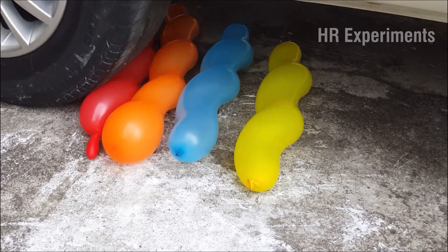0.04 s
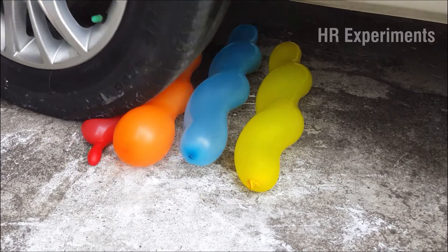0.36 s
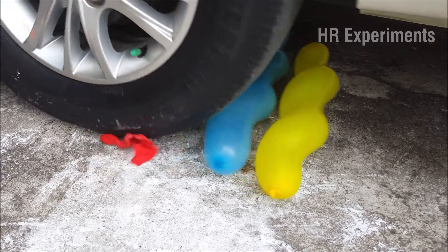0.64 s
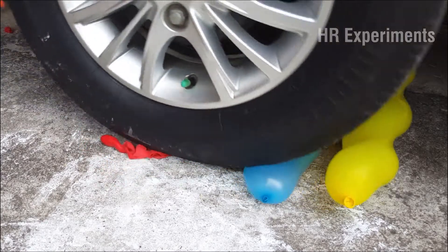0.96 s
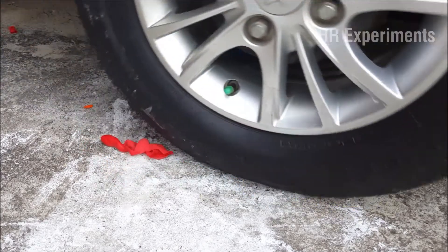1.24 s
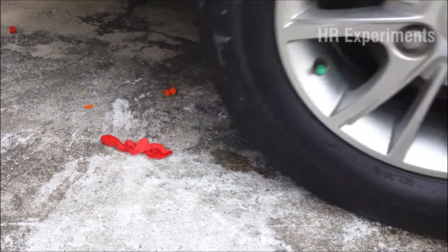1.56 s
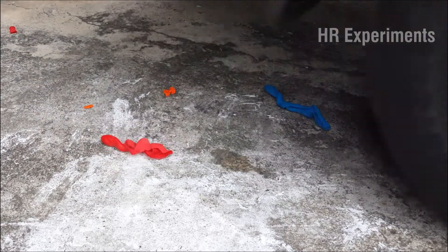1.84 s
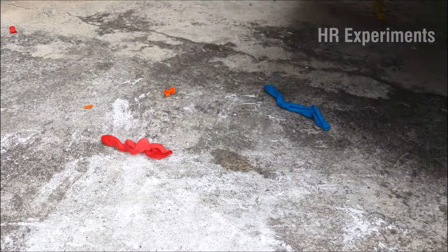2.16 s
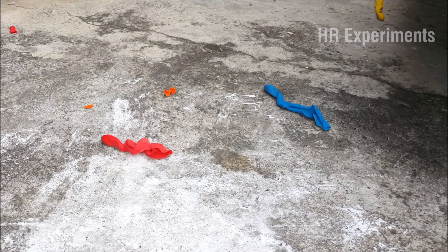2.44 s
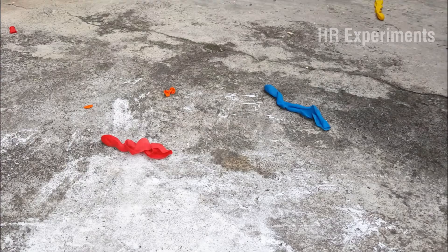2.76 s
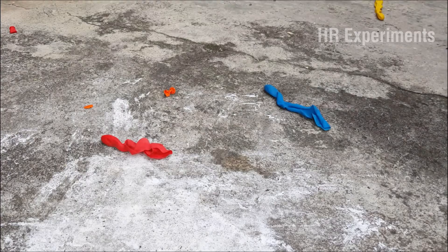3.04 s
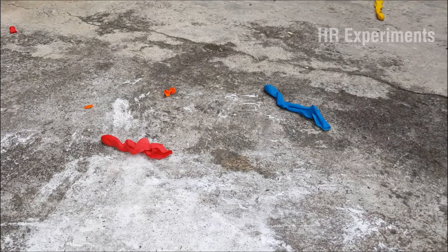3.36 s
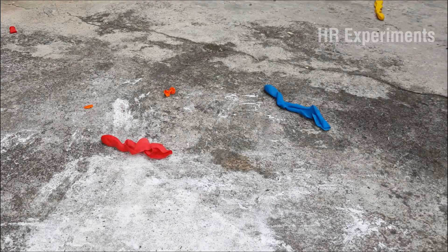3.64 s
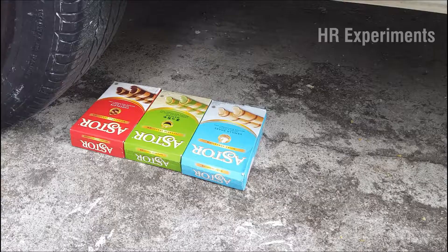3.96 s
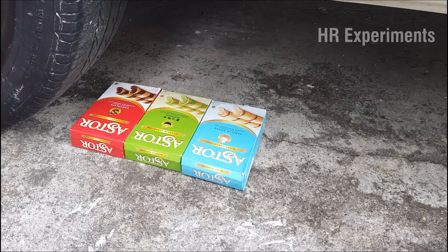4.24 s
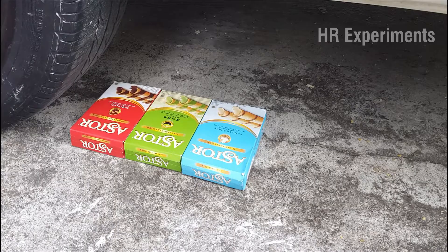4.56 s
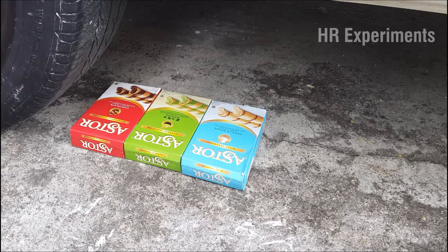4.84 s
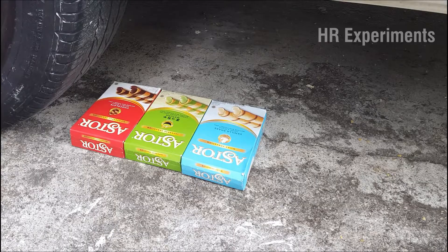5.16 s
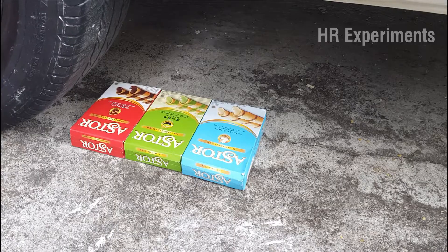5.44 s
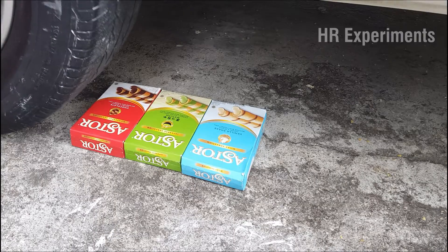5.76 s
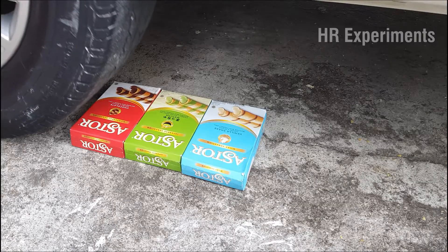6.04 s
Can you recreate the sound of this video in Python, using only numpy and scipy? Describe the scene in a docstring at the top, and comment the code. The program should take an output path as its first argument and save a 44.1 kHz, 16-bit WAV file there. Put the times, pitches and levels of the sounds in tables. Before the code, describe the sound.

Outdoors on concrete, close to the microphone, a car rolls onto balloons, which go off almost at once with two small snaps and three sharp, ringing bangs. Afterwards only the low engine hum remains, with a brief tyre hiss and three barely audible hoots far away. The idle then turns suddenly a little fuller, a few dull knocks sound, and the throttle just begins to open.

```python
"""An engine runs close to a stereo microphone in a concrete yard as a car rolls up, grit ticking in its tread.
The tyre bursts a row of long balloons: two small snaps, then three bangs that ring under the car and
die away round the yard. The recorder's gain ducks, holds and creeps back while the car rolls on,
with a brief tread hiss and three faint hoots far off. After an abrupt change of scene the engine
idles close by with a few soft clunks, and grows louder at the very end as the throttle opens."""
import sys
import numpy as np
from scipy import signal
from scipy.fft import rfft, irfft, next_fast_len
from scipy.io import wavfile
from scipy.ndimage import uniform_filter1d, minimum_filter1d

SR = 44100
rng = np.random.default_rng(int(sys.argv[2]) if len(sys.argv) > 2 else 0)


def file_out(sig):
    """Save sig as 16-bit WAV at sys.argv[1]."""
    # one column per channel
    cols = np.atleast_2d(sig).T
    # limit, then scale
    lim = np.clip(cols, -1, 1)
    pcm = np.round(lim * 32767).astype(np.int16)
    wavfile.write(sys.argv[1], SR, pcm)


N = 273420
TIME = np.arange(N) / SR
FFT_SIZE = 2 * next_fast_len(N // 2 + SR // 4)
FREQS = np.maximum(np.arange(FFT_SIZE // 2 + 1) * SR / FFT_SIZE, 1)
THROTTLE_S = 5.92

# How alike left and right are. Each row: frequency in Hz, correlation for the bursts, for the car.
STEREO_LIKENESS = [(60, .1, .99), (130, 0.8, 0.97), (220, 0.62, 0.89), (393, 0.87, 0.91), (710, 0.2, 0.14),
                   (1190, -.25, 0.47), (2470, .05, 0.34), (5010, -.1, 0.026)]


def from_db(db):
    """Decibels to gain."""
    return 10 ** (np.asarray(db) / 20)


def since(start):
    """Seconds gone by since start, zero before it."""
    return np.maximum(TIME - start, 0)


def decay(start, t60, rise):
    """Envelope that swells after start and dies away."""
    age = since(start)
    return (1 - np.exp(-age / rise)) * from_db(-60 * np.minimum(age / t60, 4))


def white():
    """Two unrelated white noises."""
    return rng.standard_normal((2, N))


def drift(per_s):
    """A random wobble with a new value so many times a second."""
    return np.interp(TIME * per_s, np.arange(N), np.clip(rng.standard_normal(N), -2, 2))


def tone(hz, width_hz):
    """A sine of rms 1 whose phase wanders enough to blur it to the given width."""
    kicks = rng.standard_normal(N) * np.sqrt(2 * np.pi * width_hz / SR)
    pole = np.exp(-4 * np.pi * width_hz / SR)
    wander = signal.lfilter([1 - pole], [1, -pole], kicks)
    return np.sqrt(2) * np.sin(np.cumsum(2 * np.pi * hz / SR + wander))


def butterworth(x, order, edges_hz, kind):
    """Low-, high- or band-pass with a flat passband."""
    return signal.sosfilt(signal.butter(order, edges_hz, kind, fs=SR, output="sos"), x)


def resonance(x, hz, width_hz):
    """Two-pole band-pass with gain 1 at its peak."""
    r = np.exp(-np.pi * width_hz / SR)
    feedback = [1, -2 * r * np.cos(2 * np.pi * hz / SR), r * r]
    return signal.lfilter(np.array([1, 0, -1]) * (1 - r * r) / 2, feedback, x)


def curves(rows):
    """The columns of a (Hz, ..) table at every frequency, joined on a log axis."""
    hz, *columns = np.transpose(rows)
    return [np.interp(np.log(FREQS), np.log(hz), column) for column in columns]


def colour(x, curve_db, lag_s=0):
    """Minimum-phase filter with the given gain curve and delay: nothing sounds early."""
    cepstrum = irfft(np.log(from_db(curve_db)))
    cepstrum[1:FFT_SIZE // 2] *= 2
    cepstrum[FFT_SIZE // 2 + 1:] = 0
    response = np.exp(rfft(cepstrum) - 2j * np.pi * FREQS * lag_s)
    return irfft(rfft(x, FFT_SIZE) * response)[..., :N]


def spread(pair, density_db, likeness):
    """Two white signals become left and right, with a spectrum in dB per Hz and a correlation."""
    alike = np.clip(likeness, -.99, .99)
    mid = colour(pair[0], density_db + 10 * np.log10((1 + alike) / 2))
    side = colour(pair[1], density_db + 10 * np.log10((1 - alike) / 2))
    return np.sqrt(SR / 2) * np.array([mid + side, mid - side])


def car_places(pass_s=1.32, pass_length_s=0.64, cut_s=3.81):
    """Shares over time of the car's three places: rolling up, rolled past, idling close."""
    close = np.clip(since(cut_s) / 0.0051, 0, 1)
    past = np.clip((TIME - pass_s) / pass_length_s + .5, 0, 1)
    return np.array([(1 - past) * (1 - close), past * (1 - close), close])


def underbody(x, echo=0.11, longest_s=.03, low_hz=600, count=8):
    """Short echoes between floor pan and ground put a steady ripple on the treble."""
    treble = butterworth(x, 2, low_hz, "high")
    lags = (rng.uniform(.002, longest_s, count) * SR).astype(int)
    return x + echo * sum(np.pad(treble, [(0, 0), (lag, 0)])[:, :N] for lag in lags)


def engine(firing_hz=26.08, first_firing_s=0.024, throb=0.1, valve_throb=0.06, uneven=0.82,
           hiss_db=0.04, chatter_depth=.4, throttle_db_per_s=8):
    """Rumble and hiss pulse with the firings over steady tones, all shaded by where the car stands."""
    # Engine noise. Each row: frequency in Hz, then dB per Hz rolling up, rolled past, idling close.
    noise_spectra = [(20, -68.5, -75, -73), (45, -75.5, -68.5, -69.5), (77.5, -57, -66, -64),
                     (124, -66.5, -68.5, -64), (174, -65, -72, -70.5), (254, -66, -74, -68),
                     (314, -73.5, -77, -75), (631, -75, -81, -78), (1140, -76.5, -85.5, -80.5),
                     (2430, -77, -87, -79.5), (4063, -80.5, -92, -84), (5340, -88.5, -100, -91),
                     (9120, -98.5, -109, -101), (15500, -104, -115, -105)]
    # Hum, belt ring and other tones. Each row: pitch and width in Hz, then dB at the same three places.
    steady_tones = [(26.1, 0.14, -53, -54, -50), (76, 4, -62, -56.5, -51.5), (84.7, 2.5, -62.5, -59, -46),
                    (101.7, 4, -60, -69, -50.5), (119.3, 3, -61, -57, -50.5), (133.7, 3, -52, -50.5, -47),
                    (267, 1.3, -45.5, -68.5, -46.5), (282.5, 11.5, -52, -60.5, -51.5),
                    (400.4, 2, -63.5, -61.5, -57), (469, 4, -75, -62, -61), (787, 3.6, -55.5, -62.5, -70),
                    (1397, 3, -62, -69, -63), (2390, 25, -57.5, -87.5, -55), (2583, 63, -50, -66, -53),
                    (3580, 50, -65.5, -80, -60.5), (4320, 60, -67, -80, -64), (7780, 70, -84.5, -90.5, -77)]
    # Each cylinder's ticking strength in dB, in firing order.
    cylinders_db = [0.34, -1, .4, 0.035]
    # The engine is to the right. Each row: frequency in Hz, left minus right in dB, left lag in seconds.
    bearing = [(200, 0.1, 0.00016), (400, -.5, 0.00012), (750, -1.5, 0.00042), (1500, -2.5, 0.00036),
               (15000, -1, .00045)]
    places = np.sqrt(car_places())
    firings = firing_hz * (TIME - first_firing_s)
    cylinder = from_db(cylinders_db)[np.round(firings).astype(int) % len(cylinders_db)]
    phase = 2 * np.pi * firings
    beat = throb * np.cos(phase) + valve_throb * np.cos(3 * phase)
    air = from_db(hiss_db) * underbody(white()) * cylinder
    air *= 1 + beat * (1 + uneven * drift(firing_hz))
    likeness = curves(STEREO_LIKENESS)[1]
    out = sum(spread(air * place, db, likeness) for place, db in zip(places, curves(noise_spectra)))
    chatter = cylinder ** 2 * (1 + chatter_depth * np.cos(phase))
    for hz, width, *levels_db in steady_tones:
        # long waves reach both microphone ports alike, short ones by different paths
        line = tone(hz, width) if hz < 1000 else np.array([tone(hz, width), tone(hz, width)]) * chatter
        out += (from_db(levels_db) @ places) * line
    side_db, lag_s = curves(bearing)
    effort = from_db(throttle_db_per_s * since(THROTTLE_S))
    return effort * np.array([colour(out[0], side_db / 2, lag_s), colour(out[1], -side_db / 2)])


def alternator(width_hz=10, flutter_db=2.0, octave_db=-12, speed_up_per_s=0.0196,
               swell_s=2.86, swell_db_per_s=9):
    """A thin whine and its octave flutter at each port and rise in pitch as the throttle opens."""
    # The whine rolling up, rolled past and idling close. Each row: pitch in Hz, level in dB.
    whine_by_place = [(6255, -72), (6215, -73.5), (6258, -67.5)]
    places = car_places()
    hz, db = np.transpose(whine_by_place) @ places
    hz *= 1 + speed_up_per_s * since(THROTTLE_S)
    db += places[1] * swell_db_per_s * since(swell_s)  # swells until the change of scene
    channels = []
    for _ in range(2):
        whine = tone(hz, width_hz) + from_db(octave_db) * tone(2 * hz, 2 * width_hz)
        channels.append(whine * from_db(flutter_db * drift(18)))
    return from_db(db) * np.array(channels)


def grit(t60=0.038, band_hz=(1800, 9000)):
    """Sand grains crack under the tread in short bright ticks."""
    # Each row: start in seconds, relative level in dB.
    grains = [(0.096, -61), (0.126, -60), (0.246, -57), (0.278, -41), (0.355, -50), (5.702, -46)]
    ticks = sum(from_db(db) * decay(start, t60, rise=.0005) for start, db in grains)
    return 2 * butterworth(ticks * white(), 1, band_hz, "band")


def clunks(rise_s=0.018):
    """Dull, slow-edged knocks from the car and its tyre."""
    # Each row: start in seconds, relative level in dB, bass and treble edges in Hz, t60 in seconds.
    knocks = [(0.225, -47, 25, 90, 0.54), (0.305, -28.5, 49, 282, 0.13), (0.353, -38, 110, 1600, 0.19),
              (0.379, -27, 50, 212, 0.16), (1.815, -39.5, 118, 2440, 0.15), (1.985, -44, 70, 2510, 0.13),
              (5.174, -23, 82, 220, 0.057), (5.256, -36, 190, 776, 0.25), (5.325, -25, 110, 353, 0.061),
              (6.056, -38, 130, 870, 0.28)]
    noise = spread(white(), 0, curves(STEREO_LIKENESS)[1])
    out = 0
    for start, db, low_hz, high_hz, t60 in knocks:
        body = butterworth(noise, 2, [low_hz, high_hz], "band")
        out += from_db(db) * 2 * body / body.std() * decay(start, t60, rise_s)
    return out


def balloons(echoes_per_s=5000, front=7.1, pocket_hz=830, pocket_width_hz=120, lumpy_db=2.5,
             ring_t60=0.31, wall_lag_s=0.025, wall_db=-3, wall_t60=0.18, yard_t60=0.83):
    """Each rupture sends out a shock and close reflections, rings under the car and echoes in the yard."""
    # Each row: start in seconds, crack level in dB, its t60 in seconds, its treble edge in Hz,
    # then relative levels in dB of the air pocket's knock, the ring and the yard echo.
    bursts = [(0.393, -15.5, .035, 5000, -8, -35, -40.5), (0.4463, -7.5, 0.067, 3006, 3, -34, -44.5),
              (0.484, 14.5, 0.095, 18000, -18, 11.5, -8.5), (0.6415, 17.5, 0.049, 14000, -20.5, 10.5, -4.5),
              (1.1396, 15.5, 0.07, 10000, -10.5, 7.5, -5.5)]
    # Colour of a burst. Each row: frequency in Hz, then dB per Hz of crack, ring and yard echo.
    burst_spectra = [(30, -57.5, -69, -61.5), (65, -52.5, -54.5, -54.5), (129.7, -38, -43, -44),
                     (194, -39.5, -35, -36), (303, -48.5, -43, -36), (399, -39, -28, -32.5),
                     (540, -39, -28.5, -30), (730, -39.5, -31, -33), (1080, -36, -32.5, -34.5),
                     (1594, -35, -34.5, -36.5), (2160, -35.5, -38, -37), (3200, -41, -39, -42.5),
                     (4670, -45.5, -45.5, -50), (8300, -49.5, -53, -60), (15550, -58, -65.5, -77)]
    # Air modes between floor pan and ground. Each row: pitch and width in Hz, relative level in dB.
    gap_modes = [(407.2, 35, 2), (553, 33, -9.5), (636, 19, -3), (680, 10, -1), (726, 8, 0.5), (784, 14, 1),
                 (1012, 14, -4.5), (1276, 38, 2), (1670, 26, -7), (2160, 18, -10)]
    share = echoes_per_s / SR
    reflections = rng.choice([-1, 1], (2, N)) * (rng.random((2, N)) < share) / np.sqrt(share)
    crack, ring, yard = 0, 0, 0
    for start, crack_db, t60, edge_hz, pocket_db, ring_db, yard_db in bursts:
        shock = reflections * decay(start, t60, rise=0.0013) + 1e-18
        shock[:, round(start * SR)] += front
        # a rupture pinched under the tread is duller, and the air trapped there knocks
        shock = butterworth(shock, 1, edge_hz, "low")
        knock = 2 * from_db(pocket_db) * resonance(shock[0], pocket_hz, pocket_width_hz)
        crack += from_db(crack_db) * (shock + knock)
        # a nearby wall sends the ring back as a second bloom
        bloom = from_db(wall_db) * decay(start + wall_lag_s, wall_t60, rise=0.00096)
        ring += from_db(ring_db) * np.hypot(decay(start, ring_t60, rise=0.0097), bloom)
        yard += from_db(yard_db) * decay(start, yard_t60, rise=0.033)
    bunches = from_db(lumpy_db * drift(110))  # echoes off separate walls arrive in bunches
    likeness = curves(STEREO_LIKENESS)[0]
    crack_colour, ring_colour, yard_colour = curves(burst_spectra)
    near = spread(crack, crack_colour, likeness) + spread(ring * bunches * white(), ring_colour, likeness)
    modes = sum(from_db(db - 2) * resonance(near.mean(axis=0), hz, width) for hz, width, db in gap_modes)
    return near + modes + spread(yard * white(), yard_colour, likeness)


def tread_hiss(centre_s=2.11, half_length_s=.08, db=-57, band_hz=(5000, 11000)):
    """Rubber on dusty concrete: a thin hiss swells and fades as the tyre leaves."""
    swell = np.exp(-((TIME - centre_s) / half_length_s) ** 2)
    return from_db(db) * swell * butterworth(white(), 2, band_hz, "band")


def hoots(width_hz=25, pitch_sag=.05):
    """Blurred tones far off; each rises and falls in one arch of pitch and level."""
    # Each row: start and length in seconds, top pitch in Hz, top level in dB.
    far_hoots = [(2.838, 0.18, 465.5, -50.5), (3.064, 0.11, 522, -51), (3.147, 0.19, 583, -53)]
    out = 0
    for start, length, hz, db in far_hoots:
        arch = np.sin(np.pi * np.minimum(since(start) / length, 1))
        out += from_db(db) * arch * tone(hz * (1 - pitch_sag * (1 - arch)), width_hz)
    return out


def scene():
    """Everything that reaches the microphone."""
    return balloons() + engine() + alternator() + clunks() + grit() + tread_hiss() + hoots()


def gain_control(x, threshold_db=-13.0, slope=0.85, hold_s=0.37, release_db_per_s=29,
                 window_s=0.0096, attack_s=0.0065):
    """The recorder's gain drops as a bang arrives, stays down, then creeps back at a steady rate."""
    power = uniform_filter1d(np.mean(x ** 2, axis=0), int(window_s * SR))
    level_db = 10 * np.log10(np.maximum(power, 1e-12))
    excess_db = slope * np.maximum(level_db - threshold_db, 0)
    half = int(hold_s * SR / 2)
    held_db = -minimum_filter1d(-excess_db, 2 * half + 1, origin=half, mode="nearest")
    release_db = release_db_per_s * TIME
    cut_db = np.maximum.accumulate(held_db + release_db) - release_db
    pole = np.exp(-1 / (attack_s * SR))
    return x * from_db(-signal.lfilter([1 - pole], [1, -pole], cut_db))


def record(dry):
    """Port colour, a rumble filter, gain control, overload near full scale and a steep top cut."""
    # Response of the microphone ports. Each row: frequency in Hz, left and right gain in dB.
    ports = [(4270, -1, -0.5), (7160, -6.5, 2), (8470, -16.5, 5.5), (10060, -12.5, -4), (12100, -4, 1.5),
             (16180, -4, 2)]
    heard = np.array([colour(channel, port_db) for channel, port_db in zip(dry, curves(ports))])
    heard = butterworth(heard, 2, 18, "high")
    clipped = np.clip(gain_control(heard), -.95, .95)
    return signal.sosfilt(signal.ellip(10, .1, 80, 15800, fs=SR, output="sos"), clipped)


dry = scene()
out = record(dry)
file_out(out)
```